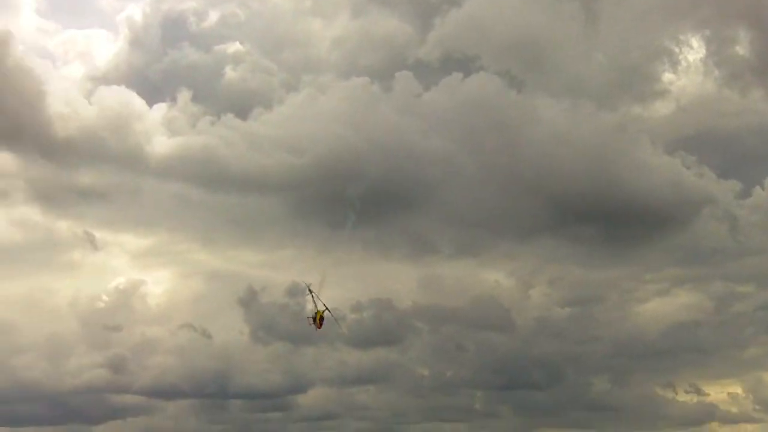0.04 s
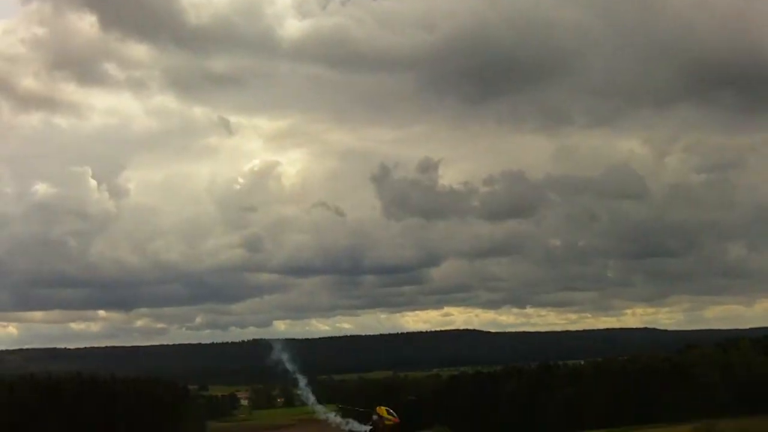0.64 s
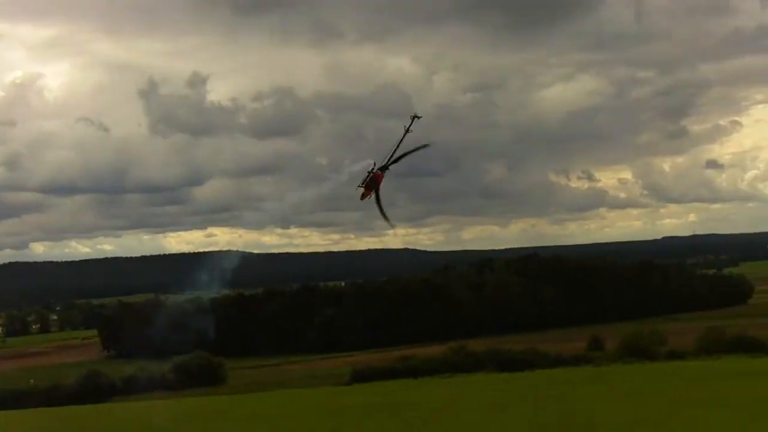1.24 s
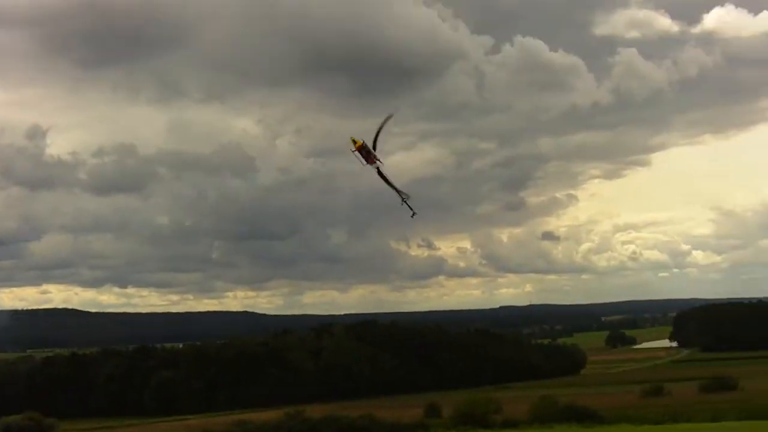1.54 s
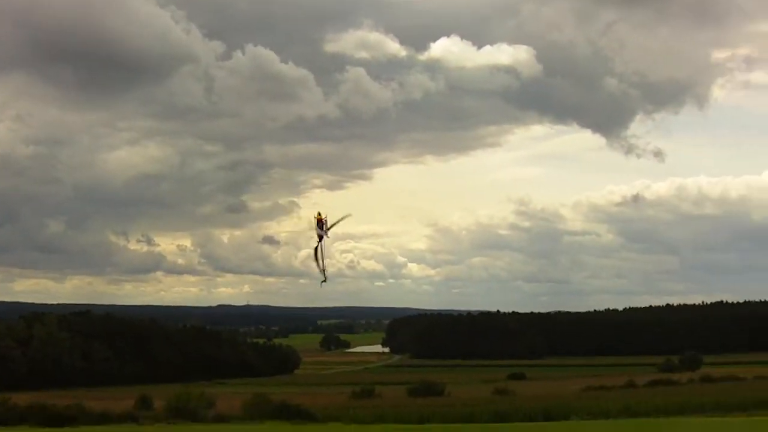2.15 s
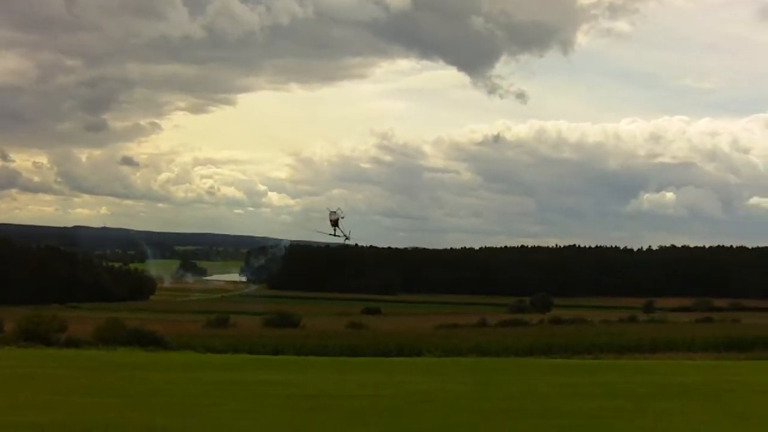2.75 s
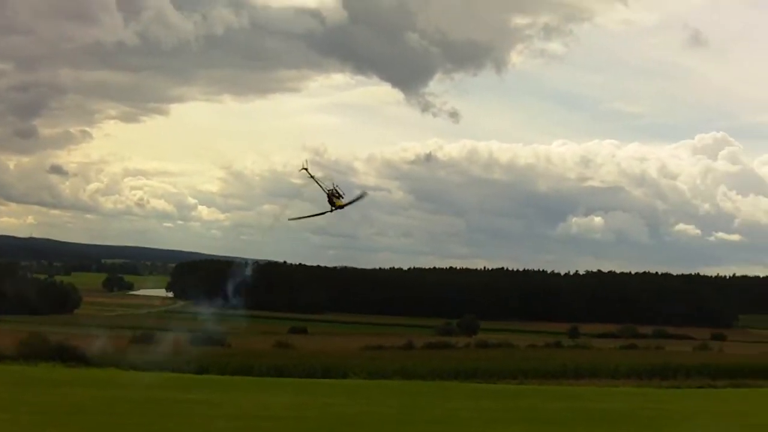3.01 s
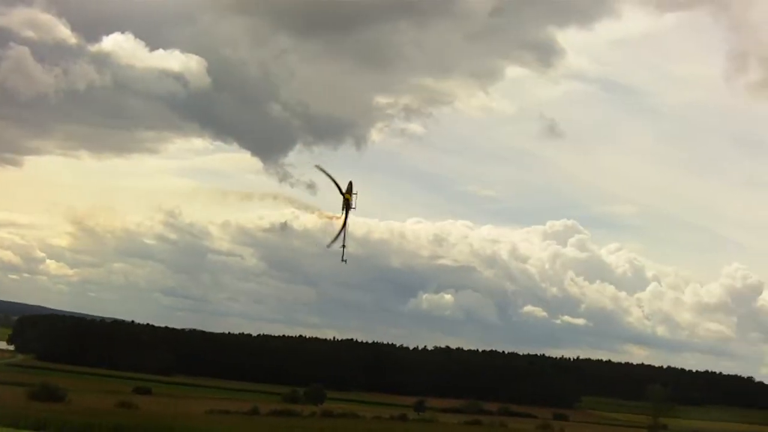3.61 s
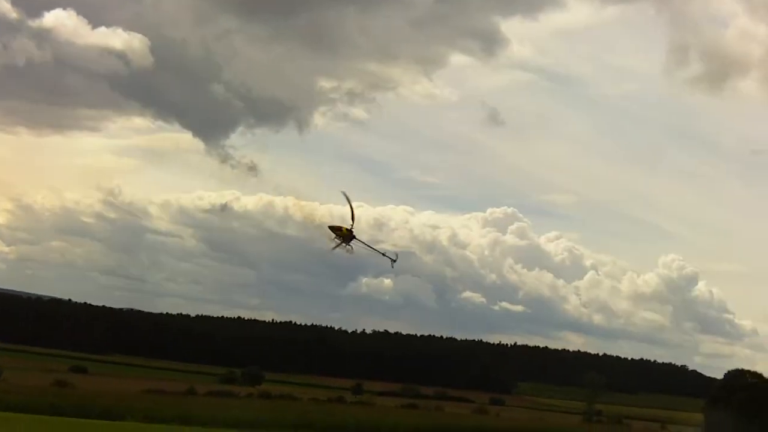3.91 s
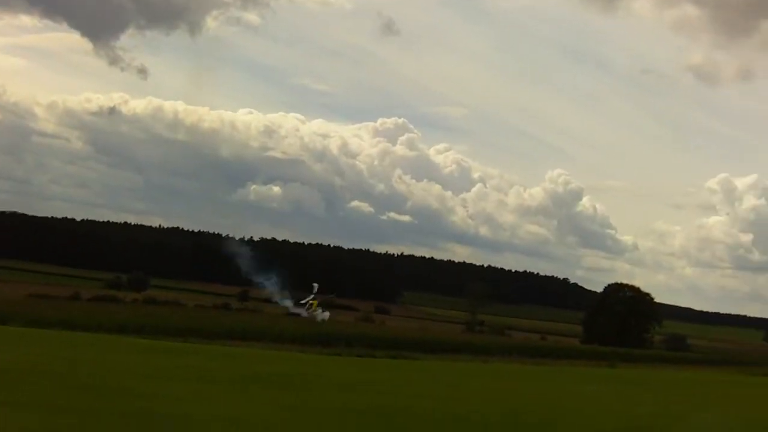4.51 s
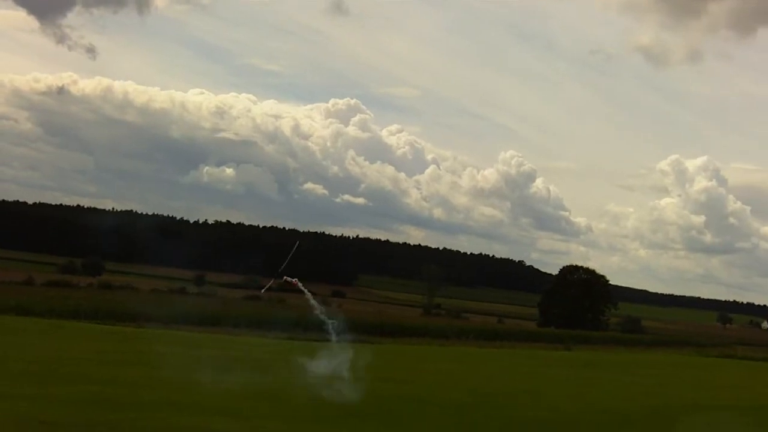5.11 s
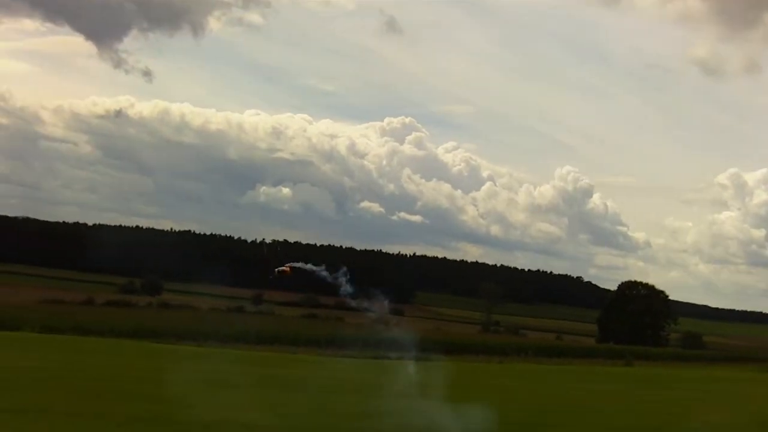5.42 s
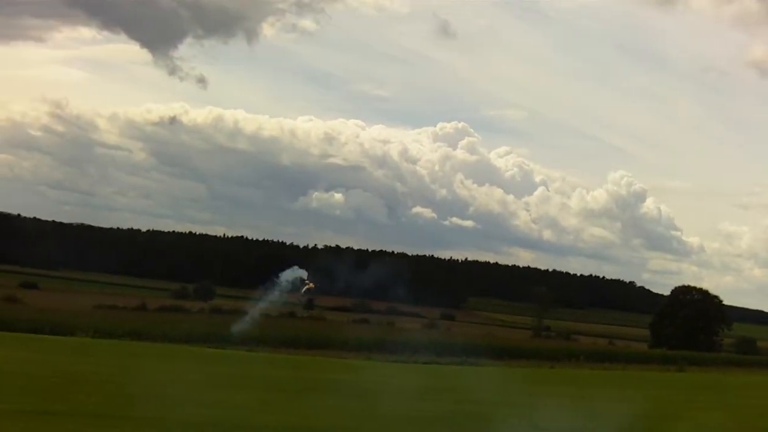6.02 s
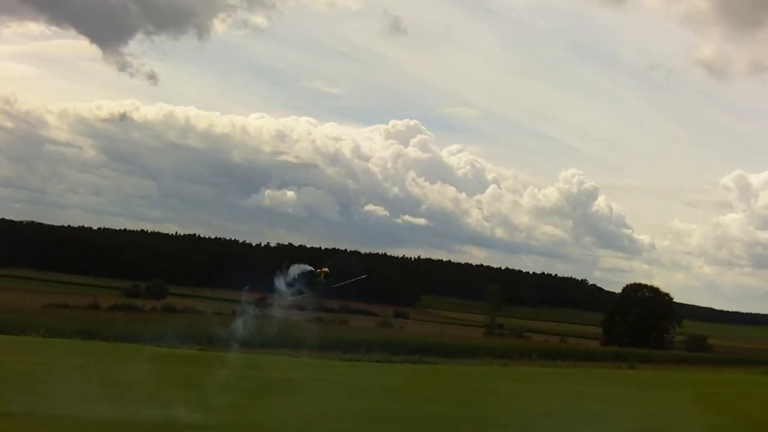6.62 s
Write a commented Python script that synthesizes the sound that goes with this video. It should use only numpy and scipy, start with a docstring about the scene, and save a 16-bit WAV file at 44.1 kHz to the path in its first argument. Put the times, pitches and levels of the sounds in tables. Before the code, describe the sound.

Heard outdoors through a small camera's microphones, a radio-controlled helicopter buzzes and whines without a break, with singing gears and a raspy hiss. It opens with quick rotor cracks and wind rumble, then the pitch sags and rises with each manoeuvre. Dull blade thuds mark the hard turns, another run of slaps comes later, and a phasing sweep follows the machine up and down over the grass.

```python
"""A meadow, a glow-engined model helicopter flying aerobatics over it, now high and near, now low.
Heard from the close microphone pair of a small camera, with wind buffeting the ports.
The two-stroke whine sags under load and swells order by order as the exhaust turns; the gears sing,
and the rotor chops and slaps the air over a wash of exhaust hiss. The echo off the grass sweeps
through the sound as the machine climbs and dives."""
import sys
import numpy as np
from scipy import signal
from scipy.fft import rfft, irfft
from scipy.io import wavfile

SR = 44100
rng = np.random.default_rng(int(sys.argv[2]) if len(sys.argv) > 2 else 0)


def generate_wav(sig):
    """Save sig (samples, or channels by samples) to the path in sys.argv[1] as 16-bit PCM at SR."""
    pcm = np.round(np.clip(np.atleast_2d(sig).T, -1, 1) * 32767).astype(np.int16)
    wavfile.write(sys.argv[1], SR, pcm)


N = 297675
TIME = np.arange(N) / SR
BIN_HZ = np.maximum(np.arange(N // 2 + 1) * SR / N, 1)
FIRINGS_PER_BLADE = 4.098


def from_db(db):
    """Decibels to gain."""
    return 10 ** (np.asarray(db) / 20)

def rms_one(x):
    """Scale to unit power."""
    return x / np.sqrt(np.mean(x ** 2) + 1e-20)

def in_time(curve):
    """A curve's value at every sample."""
    return np.interp(TIME, *np.transpose(curve))

def gain_at(spectrum, hz):
    """Gain of a dB spectrum, read on a log-frequency axis."""
    points_hz, db = np.transpose(spectrum)
    return from_db(np.interp(np.log(hz), np.log(points_hz), db))

def butter(x, hz, kind):
    """Second-order Butterworth filter."""
    return signal.sosfilt(signal.butter(2, hz, kind, fs=SR, output="sos"), x)

def drift(rate):
    """Slow chance of spread 1, changing about rate times a second."""
    step, settle = 40, 2000
    pole = np.exp(-2 * np.pi * rate * step / SR)
    white = rng.standard_normal(N // step + settle + 2)
    slow = signal.lfilter([1], [1, -2 * pole, pole ** 2], white)[settle:]
    return np.interp(np.arange(N) / step, np.arange(len(slow)), rms_one(slow))

def swell(s, length_s, height):
    """A bell-shaped rise and fall around time s."""
    return height * np.exp(-(2 * (TIME - s) / length_s) ** 2)

def swells(rows):
    """The sum of a table's bells."""
    return sum(swell(*row) for row in rows)

def tone(turns, flutter, rate):
    """A sine of rms 1 whose height and phase flutter in the turbulent air."""
    angle = 2 * np.pi * (turns + rng.random())
    wave = (1 + flutter * drift(rate)) * np.cos(angle) + flutter * drift(rate) * np.sin(angle)
    return wave * np.sqrt(2 / (1 + 2 * flutter ** 2))

def throb(turns, depth, sharpness):
    """A gain of unit power that swells once a turn."""
    pulse = np.exp(sharpness * (np.cos(2 * np.pi * turns) - 1))
    pulse = pulse / pulse.mean() - 1
    return (1 + depth * pulse) / np.sqrt(1 + depth ** 2 * pulse.var())

def flared(multiples, levels_db, flares, firing_hz):
    """Line levels in dB; each flare lifts the line nearest to its pitch."""
    levels = list(levels_db)
    for s, length_s, hz, db in flares:
        lines_hz = np.array(multiples) * np.interp(s, TIME, firing_hz)
        nearest = np.argmin(np.abs(lines_hz - hz))
        levels[nearest] = levels[nearest] + swell(s, length_s, db)
    return levels


# firing rate as heard at the microphone: t/s, f/Hz
FIRING_RATE = [(0.0, 280.7), (0.66, 282.7), (0.84, 274.0), (1.0, 255.7), (1.14, 249.6), (1.38, 255.9),
               (1.85, 257.6), (2.13, 261.4), (2.31, 275.0), (2.5, 280.0), (3.05, 265.0), (3.5, 252.0),
               (3.93, 247.6), (4.5, 267.5), (4.72, 267.5), (5.0, 252.2), (5.2, 253.9), (5.6, 264.2),
               (6.0, 257.6), (6.75, 255.8)]
# how squarely the firing note faces the microphone: t/s, aim/0-1
EXHAUST_AIM = [(0, 0.35), (.5, 0.3), (1.0, 0.75), (1.4, 0.97), (1.8, 1), (2.3, 0.65), (2.8, 0.3),
               (3.4, 0.81), (3.75, 0.81), (4.2, 0), (5.0, 0.05), (6.75, 0)]
# load on the blades, as the strength of their swish: t/s, level/dB
BLADE_LOAD = [(0, 4), (0.382, 2.5), (.6, 3.5), (.82, -8), (1.05, 2.5), (1.65, -3), (2.0, -3), (2.55, 4.5),
              (2.8, 3.5), (3.05, 8.5), (3.301, 3.5), (4.05, 5.5), (4.3, 1.5), (4.65, 2), (4.88, 4.5),
              (5.2, -5), (5.9, -1), (6.75, -1.5)]

def flight():
    """Firing rate, slightly unsteady count of firings, exhaust aim and blade load."""
    firing_hz = in_time(FIRING_RATE)
    turns = np.cumsum(firing_hz * (1 + 0.001363 * drift(16.6))) / SR
    return firing_hz, turns, in_time(EXHAUST_AIM), in_time(BLADE_LOAD)


# strong exhaust orders: multiple of the firing rate
STRONG_ORDERS = (1, 2, 3, 4, 5, 6, 7, 8, 10, 11, 12, 13, 20)
# each of them: level facing away/dB, change facing the microphone/dB
STRONG_LEVELS = [(-59.5, 25), (-48, 5.5), (-40.5, -7), (-37, 4.5), (-47.5, 13.5), (-36, -9), (-45, 14),
                 (-42.5, 2), (-40.5, -3.5), (-41, -4.5), (-37, 5.5), (-51, 12.5), (-46.5, 12)]
# a manoeuvre makes one order flare: t/s, length/s, f/Hz, boost/dB
ORDER_FLARES = [(0.123, 0.86, 3370, 4.5), (0.23, 0.1, 1120, 5.5), (.55, .18, 1130, 5.5), (.3, 1, 2250, 7.5),
                (.42, 0.6, 3100, 12), (0.57, 0.2, 3380, 11), (.7, 0.97, 560, 8.5), (.86, 0.1, 820, 8),
                (1.018, 0.24, 1020, 8), (1.002, 0.082, 3070, 11.5), (1.136, 0.21, 3000, 8),
                (1.332, 0.15, 3050, 7.5), (1.23, .16, 2520, 15), (1.7, 0.51, 5140, 2),
                (1.704, 0.63, 515, 6), (2.303, 0.34, 3570, 15), (2.394, .14, 2770, 15),
                (2.62, 0.23, 1670, 6), (1.41, 0.42, 1020, 8.5), (2.177, 0.52, 1060, 12),
                (2.28, 0.77, 820, 10.5), (2.702, 0.29, 1100, 6), (2.724, 1, 1370, 9.5),
                (3.172, 0.15, 1830, 16), (3.23, .16, 1040, 3), (4.28, 0.22, 1040, 6),
                (4.363, 0.92, 525, 10), (4.404, 0.18, 2110, 17), (5.52, 0.51, 2610, 12),
                (5.55, .55, 3400, 16), (5.377, .12, 2840, 10), (3.497, 0.37, 1010, 6),
                (3.768, 0.23, 1500, 12.5), (3.92, 0.24, 4950, 13), (3.883, 0.36, 1240, 9),
                (4.235, 0.42, 1290, 10.5), (4.284, 0.45, 1820, 23), (4.632, 0.14, 3200, 12.5),
                (5.128, 0.53, 5070, 24.5), (5.113, 0.28, 1770, 16), (5.29, 0.43, 3070, 11.5),
                (5.3, 0.32, 1540, 4.5), (5.314, 0.72, 770, 7), (5.51, 0.38, 1050, 11),
                (6.173, 0.93, 3090, 12.5), (6.352, 0.34, 770, 7.5), (6.505, 0.88, 1030, 7.5)]

def exhaust(turns, firing_hz, aim):
    """Strong firing orders, clean low down and rough higher up; also gives the first order's dB."""
    aimed_db = [db + aim_db * aim for db, aim_db in STRONG_LEVELS]
    levels_db = flared(STRONG_ORDERS, aimed_db, ORDER_FLARES, firing_hz)
    note = sum(from_db(db) * tone(k * turns, flutter=.24 + .0007 * k ** 2, rate=17 + .006 * k ** 3)
               for k, db in zip(STRONG_ORDERS, levels_db))
    return note, levels_db[0]


# gear whine and its sidebands: multiple of the firing rate, level/dB
GEAR_LINES = [(8.19, 2), (9.21, -1.5), (10.24, -13.5), (11.27, -10), (13.31, -9.5), (16.38, 0),
              (18.35, -7.5)]
# one line flares: t/s, length/s, f/Hz, boost/dB
GEAR_LINE_FLARES = [(1.65, .6, 4720, 4), (3.22, 0.13, 3460, 19), (4.05, 0.34, 3350, 13),
                    (5.166, .16, 3370, 22)]
# the whole whine swells or dips: t/s, length/s, change/dB
GEAR_CHANGES = [(1.61, 0.59, 6.5), (4.334, 0.65, 6.5), (5.0, 0.24, -19), (5.6, .9, 5.5), (6.353, 0.37, 4.5)]

def gears(turns, firing_hz, aim):
    """Gear whine, out of tune with the engine and weaker when the exhaust faces the microphone."""
    multiples, levels_db = np.transpose(GEAR_LINES)
    levels_db = flared(multiples, levels_db, GEAR_LINE_FLARES, firing_hz)
    whine = sum(from_db(db) * tone(k * turns, flutter=.21, rate=29)
                for k, db in zip(multiples, levels_db))
    return from_db(-36 - 6.5 * aim + swells(GEAR_CHANGES)) * whine


# the machine pulls out of a dive: t/s, length/s, boost/dB
PULL_OUTS = [(1.025, 0.46, 11), (4.14, 0.47, 18)]

def rotor_drone(blades, firing_note_db):
    """The rotor's fifth harmonic, beamed at the microphone along with the firing note."""
    return from_db(firing_note_db - 6.5 + swells(PULL_OUTS)) * tone(5 * blades, flutter=.23, rate=11)


# spectrum of the rushing air: f/Hz, density/dB
AIR_COLOUR = [(30, -50), (130, -32), (300, 1), (480, 3), (660, -1.5), (1350, 0.5), (2200, 4.5), (3100, 6.5),
              (4300, 3.5), (7600, 0), (8500, 2.5), (11400, 3), (12400, -2.5), (15200, -9)]
# edges of its bands: f/Hz
AIR_EDGES = (25, 600, 1620, 2400, 3500, 5500, 8000, 11500, 15600)
# exhaust rasp: t/s, level/dB
RASP_LEVEL = [(0, -22.5), (.35, -22.5), (.55, -20), (.85, -22), (1.08, -24), (1.35, -22.5), (1.65, -24.5),
              (2.5, -20), (3.4, -20.5), (3.9, -21), (4.2, -19.5), (4.55, -19), (5.75, -20.5), (6.15, -18.5),
              (6.45, -17), (6.75, -19.5)]
# treble hiss: t/s, level/dB
HISS_LEVEL = [(0, -22), (.33, -21), (.55, -21.5), (1.3, -21.5), (1.65, -22), (2.35, -20), (2.75, -19),
              (3.1, -20.5), (3.75, -19.5), (4.15, -20), (4.75, -21), (5.9, -18.5), (6.2, -19), (6.55, -21),
              (6.75, -17)]
# how hard the blades chop the air: t/s, depth/0-1
CHOP_DEPTH = [(0, 1), (.5, 1), (.8, 1), (1.2, 1), (2.6, 1), (3.0, 0.7), (3.6, 0.7), (4.8, 1), (5.1, 1)]
# hard bites chop the rasp and hiss more deeply: t/s, length/s, depth/0-1
BLADE_BITES = [(0.778, 0.32, 0.1), (3.0, .2, 0.08), (4.814, .28, 0.1)]

def rushing_air(turns, blades, load_db):
    """Turbulence wandering band by band: lows pulse with each blade, highs with each firing too."""
    noise = rfft(rng.standard_normal(N)) * gain_at(AIR_COLOUR, BIN_HZ)
    bands = [irfft(noise * (BIN_HZ >= low) * (BIN_HZ < high), N) * from_db(.8 * drift(10))
             for low, high in zip(AIR_EDGES, AIR_EDGES[1:])]
    whoosh = rms_one(bands[0]) * from_db(-54 + load_db)
    swish = rms_one(bands[1]) * from_db(-34 + load_db)
    rasp = rms_one(sum(bands[2:5])) * from_db(in_time(RASP_LEVEL))
    hiss = rms_one(sum(bands[5:])) * from_db(in_time(HISS_LEVEL))
    chop = in_time(CHOP_DEPTH)
    rotor = (whoosh + swish) * throb(blades, chop, sharpness=.5)
    jet = (rasp + hiss) * throb(turns, depth=.046, sharpness=9.8)
    return rotor + jet * throb(blades, .042 * chop + swells(BLADE_BITES), sharpness=4.8)


# spectrum of the blade-passing harmonics: f/Hz, level/dB
THRUM_COLOUR = [(64, -43.5), (130, -39), (200, -29), (320, -21), (380, -14.5), (450, -16.5), (570, -5.5),
                (700, -5.5), (1300, -16.5)]
# they swell or ease: t/s, length/s, change/dB
THRUM_CHANGES = [(1.5, 0.5, -1.5), (2.247, 1, 5), (5.9, 0.48, 1)]

def rotor_thrum(blades, blade_hz, load_db):
    """Blade-passing harmonics that follow about half the load's swing."""
    thrum = sum(gain_at(THRUM_COLOUR, k * blade_hz) * tone(k * blades, flutter=.35, rate=9)
                for k in range(1, 17))
    return from_db(-41 + .47 * load_db + swells(THRUM_CHANGES)) * thrum


# weak exhaust orders: multiple of the firing rate
WEAK_ORDERS = (9, 14, 15, 16, 17, 18, 19, 33, 42, 43, 44, 45)
# their spectrum: f/Hz, level/dB
WEAK_COLOUR = [(2000, -2), (2600, -10), (3800, 0), (4400, -3), (5500, 0), (8500, 0), (10900, -7),
               (11450, -15), (12100, -28)]
# they stand out of the rush: t/s, length/s, boost/dB
WEAK_SWELLS = [(1.7, .9, 5.5), (5.35, .7, 5), (6.45, .6, 4.5)]

def exhaust_buzz(turns, mean_hz, aim):
    """The weaker orders of the exhaust pulses, up into the treble."""
    buzz = sum(gain_at(WEAK_COLOUR, k * mean_hz) * tone(k * turns, flutter=.2 + .0012 * k * k, rate=.7 * k)
               for k in WEAK_ORDERS)
    return from_db(-40.5 + aim + swells(WEAK_SWELLS)) * buzz


# bands of hiss: t/s, length/s, centre f/Hz, width/Hz, level/dB
HISS_BEAMS = [(.25, 0.97, 13400, 2800, -32), (1.15, .42, 13300, 3000, -27), (2.214, 0.16, 3630, 700, -25),
              (3.41, 0.56, 1036, 120, -33), (3.352, 0.5, 742, 130, -31), (6.2, 0.53, 3970, 160, -25),
              (1.228, 0.18, 10300, 2500, -21.5), (1.682, 1, 11440, 550, -28),
              (2.36, 0.28, 12100, 3500, -23.5), (2.65, 1, 6430, 1400, -27.5),
              (2.767, .1, 11000, 1100, -21.5), (2.927, 0.13, 2590, 900, -21.5),
              (3.566, 0.15, 9500, 1190, -23), (3.848, 0.16, 11200, 250, -29), (3.828, 0.36, 4800, 452, -23),
              (3.92, 0.32, 9700, 1000, -28), (5.55, 0.63, 4230, 300, -29.5), (5.55, 0.5, 2700, 200, -37),
              (5.72, .55, 14100, 1200, -32), (6.502, 0.33, 4140, 450, -25)]

def swishes():
    """Bands of hiss beamed past the microphone as the machine turns."""
    white, out = rng.standard_normal(N), np.zeros(N)
    for s, length_s, hz, width, db in HISS_BEAMS:
        band = butter(white, (hz - width / 2, hz + width / 2), "band")
        out += swell(s, length_s, from_db(db)) * rms_one(band)
    return out


# lag of the ground echo, long when the machine is high and near: t/s, lag/ms
GRASS_LAG = [(0, 3.21), (.2, 2.57), (.45, 1.81), (.62, 1.38), (.78, 1.16), (.92, 1.33), (1.1, 2.02),
             (1.3, 2.82), (1.45, 3.24), (1.62, 3.37), (1.8, 3.3), (2.0, 2.96), (2.3, 2.24), (2.5, 1.92),
             (2.68, 1.81), (2.9, 1.95), (3.3, 2.75), (3.5, 2.87), (3.7, 2.77), (3.9, 2.49), (4.5, 1.09),
             (4.65, .83), (4.83, .7), (5.0, .77), (5.2, 1.11), (5.4, 1.31), (5.7, 1.34), (6.1, 1.26),
             (6.75, 1.39)]

def ground_echo(x, share, grass_hz, block=512):
    """Add a dull copy off the grass, strongest at grazing angles; its moving lag sweeps a comb."""
    lag_ms = in_time(GRASS_LAG)
    share = np.minimum(share * (lag_ms.mean() / lag_ms) ** .17, 1)
    late, state = np.interp(TIME - lag_ms / 1000, TIME, x, left=0), [0.]
    for i in range(0, N, block):
        flip_hz = 1670 * lag_ms[i]   # the grass inverts the echo above this pitch
        warped = np.tan(np.pi * flip_hz / SR)
        allpass = (warped - 1) / (warped + 1)
        late[i:i + block], state = signal.lfilter([allpass, 1], [1, allpass], late[i:i + block], zi=state)
    echo = irfft(rfft(late) * np.exp(-(BIN_HZ / grass_hz) ** 2), N)
    return (x + share * echo) / np.sqrt(1 + share ** 2 / 2)


# wind right on the microphone ports: t/s, level/dB
WIND_LEVEL = [(0, -29.5), (.4, -31.5), (.52, -49), (.66, -31.5), (1.25, -36.5), (1.5, -44), (2.2, -56.5),
              (4.6, -69), (4.78, -39), (4.95, -68), (6.75, -88)]
# its spectrum: f/Hz, density/dB
WIND_SPECTRUM = [(25, -30), (60, -18), (140, -3.5), (300, 3), (700, 4.5), (1200, 0.5), (2500, -96)]

def port_wind():
    """Lumpy buffeting at one port as the camera swings."""
    rumble = irfft(rfft(rng.standard_normal(N)) * gain_at(WIND_SPECTRUM, BIN_HZ), N)
    gusts = from_db(4.75 * drift(9.5))
    return from_db(in_time(WIND_LEVEL)) * rms_one(rumble * gusts)


# a blade cuts its own wake: t/s, crack peak/dB, decay/ms
WAKE_CUTS = [(.1615, -7, 1.2), (.1998, -6, 1.0), (.2143, -8, 1.0), (.2292, -3, 1.0), (.2584, -7, .8),
             (.2730, -7, 1.0), (.2875, -2, 1.1), (.3020, -8, .9), (.3165, -3, 1.0), (.3310, -7, 1.0),
             (.3455, -4, 1.0), (.3600, -11, 1.0), (.3748, -2, 1.2), (.4925, -7, 1.2), (.5358, -6, .6),
             (.6970, -10, 1.5), (.7105, -11, 1.2), (.7700, -8, 1.5), (.7995, -7, 1.0), (.8320, -8, 2.0),
             (4.1425, -7, .6), (4.6475, -7, 1.2), (4.6785, -6, 1.2), (4.7105, -5, 1.0), (4.7568, -7, 1.5),
             (4.7875, -9.5, 2.2), (4.8040, -14, 1.8), (4.8195, -2.5, 2.3), (4.8352, -2, 2.1),
             (4.8508, -6, 2.4), (4.8665, -3, 1.7), (4.8815, -12, 1.8), (4.8972, -8, 2.0), (4.9135, -7, 1.9)]

def blade_slaps(size=900):
    """Crisp pressure swings; the longer ones crack lower and tear a brighter burst of air after them."""
    out, age_ms = np.zeros(N), np.arange(size) / SR * 1000
    for s, db, decay_ms in WAKE_CUTS:
        crack_band_hz = np.array([1650, 3150]) / decay_ms ** .25
        crack = butter(signal.unit_impulse(size), crack_band_hz, "band")
        rise = 2 * age_ms / decay_ms
        torn = butter(rng.standard_normal(size) * rise * np.exp(1 - rise), (1000, 11500), "band")
        start = round(s * SR)
        out[start:start + size] += from_db(db) * (crack / np.abs(crack).max() + .1 * decay_ms ** 2 * torn)
    return out


# in hard pulls every blade thuds: t/s, length/s, level/dB
HARD_PULLS = [(.75, .12, -32), (0.86, 0.2, -28), (2.965, .05, -28), (3.06, 0.12, -29.5), (4.07, .11, -26.5)]

def blade_thuds(blades):
    """Runs of dull pressure pulses, one per blade, each of its own strength."""
    passes = np.diff(np.floor(blades), prepend=0) * from_db(drift(50))
    thuds = rms_one(butter(passes + 1e-18, (580, 1100), "band"))
    return thuds * sum(swell(s, length_s, from_db(db)) for s, length_s, db in HARD_PULLS)


# width at the microphone pair: f/Hz, side minus mid/dB
PAIR_WIDTH = [(150, -99), (700, -25.5), (1400, -72.5), (2900, -23.5), (4000, -22.5), (5600, -12.5),
              (9000, -11)]

def microphone_pair(x, size=6000):
    """Two close ports hear the same direct sound and opposite shares of diffuse scatter."""
    scatter = rng.standard_normal(size) * np.exp(-3 * np.arange(size) / size)
    diffuse = signal.fftconvolve(x, scatter / np.linalg.norm(scatter))[:N]
    side = irfft(rfft(diffuse) * gain_at(PAIR_WIDTH, BIN_HZ), N)
    return np.array([x + side, x - side])


# the wash dips briefly: t/s, length/s, change/dB
WASH_DIPS = [(0.232, 0.058, -5.5), (0.375, 0.12, -4.5), (0.677, 0.042, -4), (1.11, 0.052, -1),
             (4.856, 0.069, -2.5)]

def scene():
    """Out over the meadow one shaft drives engine, gears and rotor; the grass echoes all three."""
    firing_hz, turns, aim, load_db = flight()
    blades, mean_hz = turns / FIRINGS_PER_BLADE, firing_hz.mean()
    note, firing_note_db = exhaust(turns, firing_hz, aim)
    whine = note + gears(turns, firing_hz, aim) + rotor_drone(blades, firing_note_db)
    wash = rushing_air(turns, blades, load_db)
    wash += rotor_thrum(blades, mean_hz / FIRINGS_PER_BLADE, load_db)
    wash += exhaust_buzz(turns, mean_hz, aim) + swishes()
    wash *= from_db(.95 * drift(36) + swells(WASH_DIPS))
    wash += blade_thuds(blades)
    heard = ground_echo(whine, share=.53, grass_hz=3040) + ground_echo(wash, share=.31, grass_hz=10800)
    return microphone_pair(heard + blade_slaps()) + np.array([port_wind(), port_wind()])


def record(dry):
    """The camera's microphones thin the deep bass, notch 8 kHz and cut the top steeply."""
    thinned = butter(dry, 40, "high")
    notched = signal.lfilter(*signal.iirnotch(8000, Q=45, fs=SR), thinned)
    return signal.sosfilt(signal.ellip(12, .1, 90, 15400, fs=SR, output="sos"), notched)


dry = scene()
out = record(dry)
generate_wav(out)
```